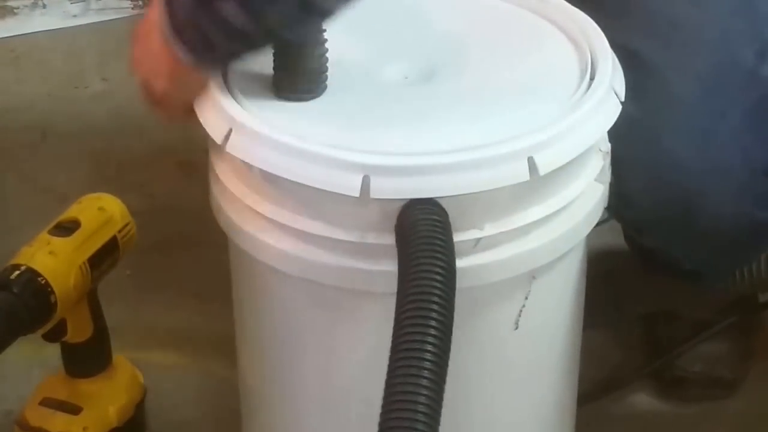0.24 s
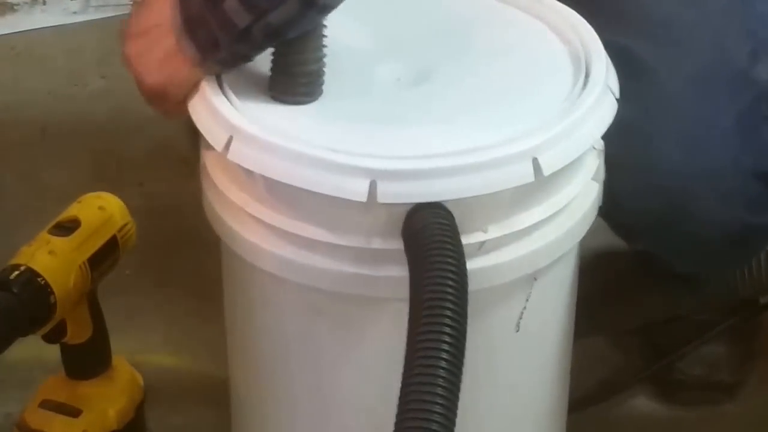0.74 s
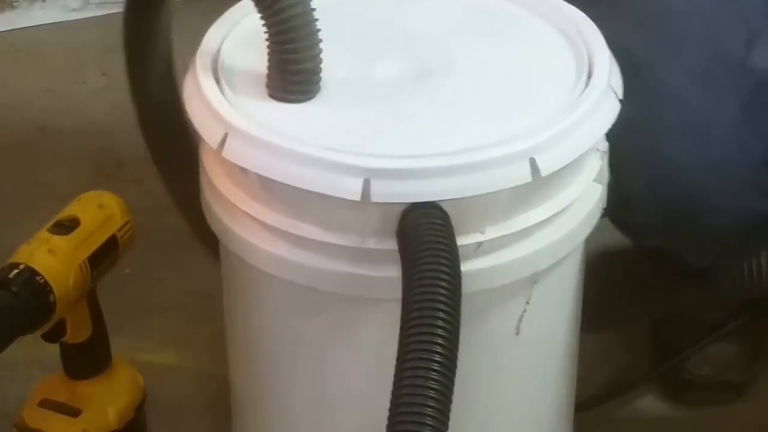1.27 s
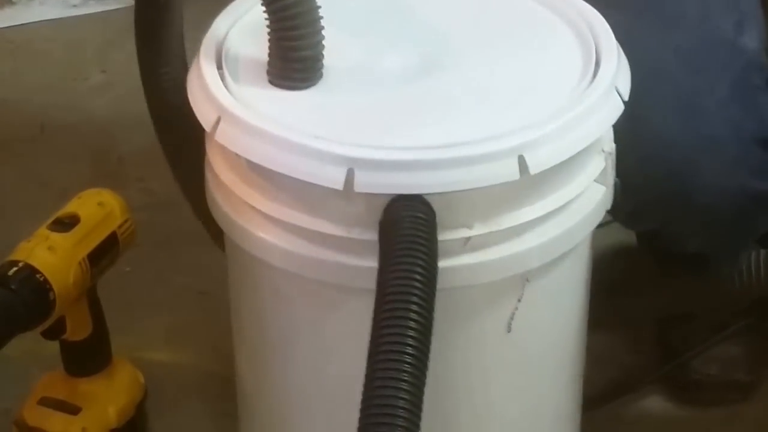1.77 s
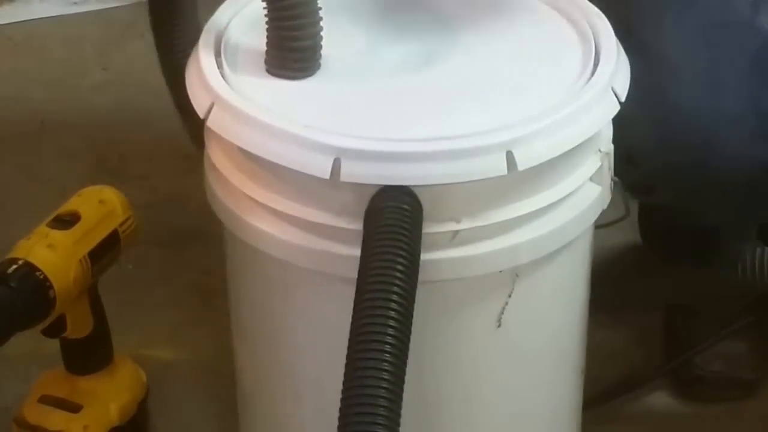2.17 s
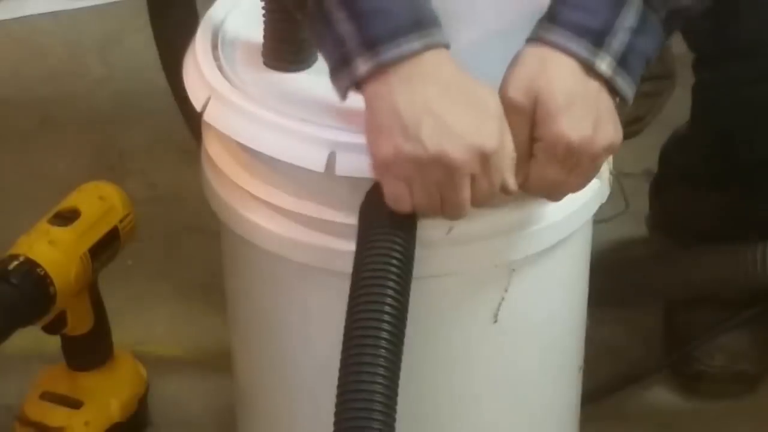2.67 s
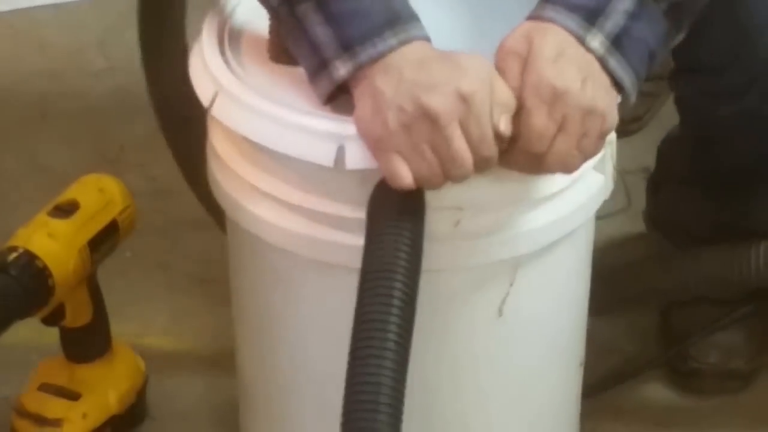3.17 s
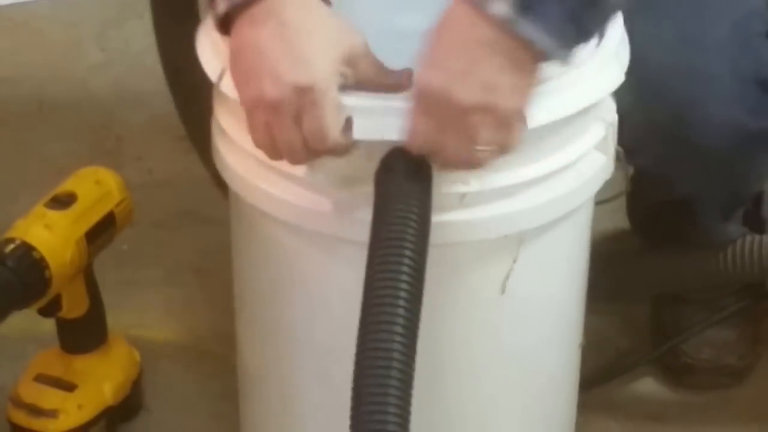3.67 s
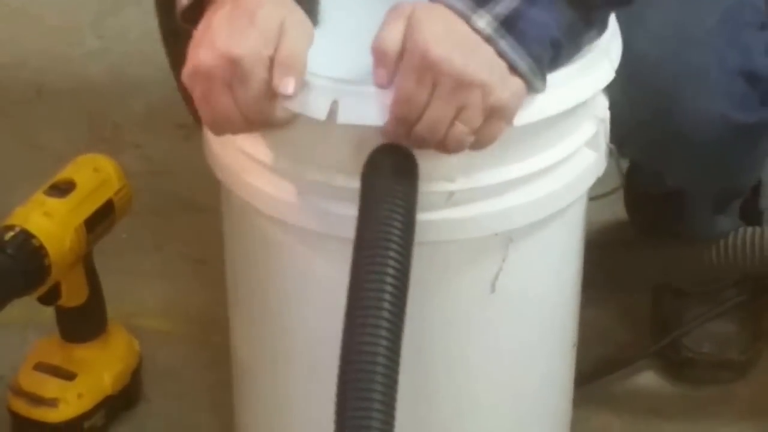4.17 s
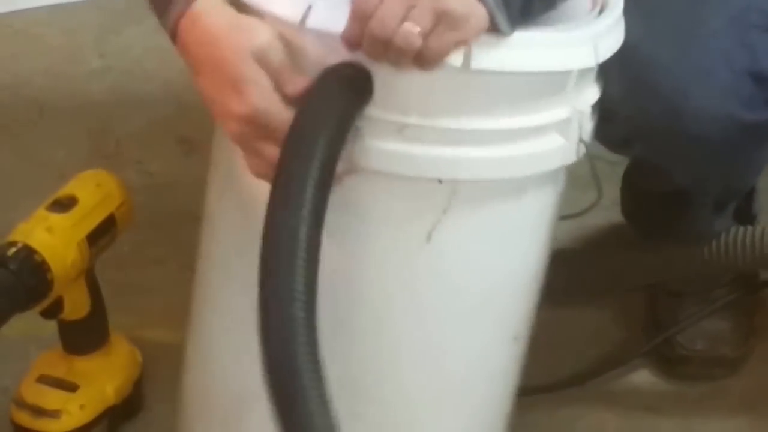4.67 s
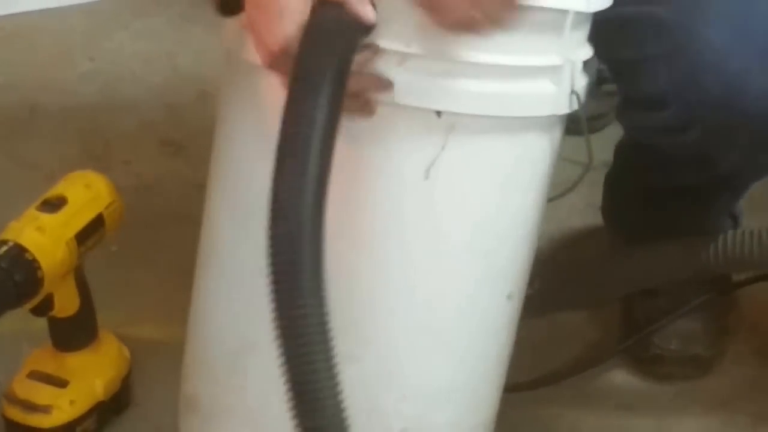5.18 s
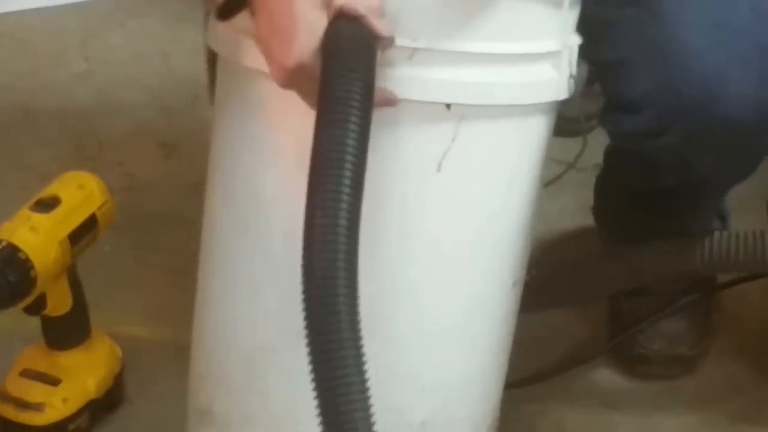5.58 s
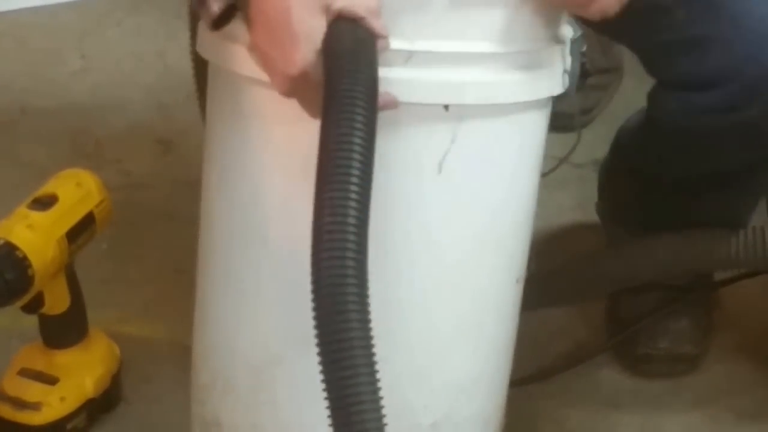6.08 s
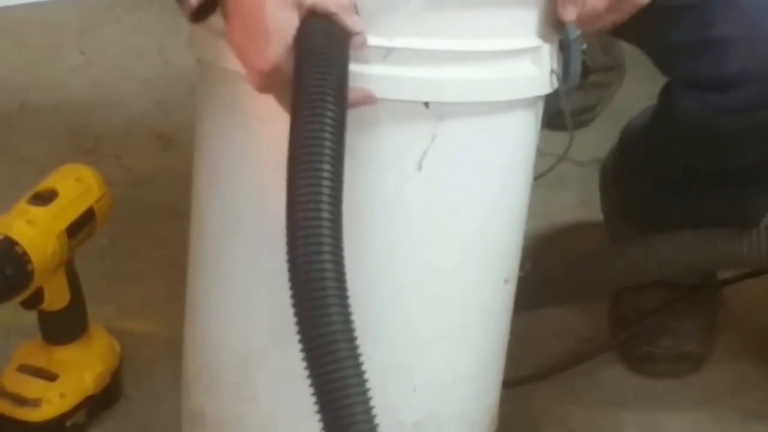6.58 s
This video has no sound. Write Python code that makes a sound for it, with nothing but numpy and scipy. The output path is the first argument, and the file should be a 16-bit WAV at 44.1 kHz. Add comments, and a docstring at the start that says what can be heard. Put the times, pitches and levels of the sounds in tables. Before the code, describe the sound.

Hands rub plastic and a tight bucket lid snaps loose with three sharp, ringing cracks, over low room rumble and steady left-side hiss.

```python
"""Hands and sleeves rub plastic over a low room rumble and steady hiss; ticks and hollow thumps follow.
A tight lid is being pried off a bucket, close by in a small workshop: its rim snaps over the bead
three times, then cracks once more faintly. Later a ribbed hose makes the ticks come faster. Random grains make
the friction, decaying sines the blows; the left microphone hisses, the right one is dull."""
import sys
import numpy as np
from scipy import signal
from scipy.fft import rfft, irfft
from scipy.io import wavfile

SR = 44100
rng = np.random.default_rng(int(sys.argv[2]) if len(sys.argv) > 2 else 0)


def transcribe(u):
    """Save the signal u as a 16-bit wav file named by the first command-line argument.

    u: samples, shape (n,) or (channels, n), limited to [-1, 1]; the rate is SR.
    q: integer samples, one column per channel.
    """
    v = np.clip(np.atleast_2d(u).T, -1, 1)
    q = np.round(v * 32767).astype(np.int16)
    wavfile.write(sys.argv[1], SR, q)


N = 301057   # length in samples
AGE = np.arange(SR // 2) / SR   # time since a blow, s


def from_db(db):
    """Decibels to gain."""
    return 10 ** (np.asarray(db) / 20)


def rms_one(x):
    """Scale to rms 1."""
    return x / np.sqrt(np.mean(x ** 2) + 1e-20)


def at_hz(points, hz):
    """Read a table on a log-frequency axis."""
    f, value = np.transpose(points)
    return np.interp(np.log(hz + 0.0012), np.log(f), value)   # the offset avoids log(0)


def colour(x, spectrum):
    """Causal (minimum-phase) filter with the given spectrum, by folding its cepstrum."""
    size = 4096
    gain = from_db(at_hz(spectrum, np.fft.rfftfreq(size, 1 / SR)))
    cepstrum = irfft(np.log(gain))
    cepstrum[1:size // 2] *= 2
    cepstrum[size // 2 + 1:] = 0
    impulse = irfft(np.exp(rfft(cepstrum)))
    return signal.oaconvolve(x, impulse)[:len(x)]


def fade(t60, rise=1e-5):
    """Envelope of a blow: quick rise (time constant, s), exponential decay by 60 dB in t60 seconds."""
    return from_db(-60 * AGE / t60) * (1 - np.exp(-AGE / rise))


def ring(hz, t60, rise):
    """One damped mode."""
    return np.sin(2 * np.pi * hz * AGE) * fade(t60, rise)


def add(track, s, sound):
    """Mix a sound in at time s."""
    at = int(s * SR)
    track[at:at + len(sound)] += sound[:N - at]


def delay(x, s):
    """The same sound s seconds later."""
    n = np.arange(len(x))
    return np.interp(n - s * SR, n, x, left=0)


def grains(per_s, spread_db, size):
    """Random stick-slip clicks of uneven size; rms 1."""
    born = rng.random(size) < per_s / SR
    sign = rng.choice([-1, 1], size)
    strength_db = spread_db * np.minimum(rng.exponential(1, size), 4)
    return rms_one(born * sign * from_db(strength_db))


def clumps(per_s, depth_db, size):
    """Gain of a grip that catches and lets go at random."""
    knots = rng.standard_normal(4096)
    position = np.arange(size) / SR * per_s
    return from_db(depth_db * np.interp(position, np.arange(len(knots)), knots))


# Brief sinkings of the background. Each row: middle in seconds, half width in seconds, level in dB.
LULLS = [(2.75, 0.26, -3.5), (4.82, 0.57, -4)]


def background(spectrum):
    """Noise with the given density; its level sags smoothly in each lull."""
    t = np.arange(N) / SR
    level_db = sum(db * np.exp(-((t - s) / width) ** 2) for s, width, db in LULLS)
    noise = rng.standard_normal(N) * np.sqrt(SR / 2)   # 0 dB per Hz
    return from_db(level_db) * colour(noise, spectrum)


# How long the workshop rings. Each row: frequency in Hz, decay by 60 dB in seconds.
ROOM_T60 = [(100, 0.29), (300, 0.37), (700, 0.3), (1500, 0.34), (4000, 0.38), (12000, 0.28)]


def room_response(onset):
    """Diffuse stereo tail, dying band by band; the two sides are most alike in the bass."""
    edges = np.geomspace(40, 16000, 11)
    out = 0
    for low, high in zip(edges, edges[1:]):
        hz = np.sqrt(low * high)
        band = signal.butter(2, [low, high], "band", fs=SR, output="sos")
        mid, side = signal.sosfilt(band, rng.standard_normal((2, len(AGE))))
        alike = 1 / (1 + (hz / 1900) ** 2)
        stereo = np.sqrt(1 + alike) * mid + np.sqrt(1 - alike) * side * [[1], [-1]]
        out = out + stereo * fade(at_hz(ROOM_T60, hz))
    out = out * (1 - np.exp(-(AGE / onset) ** 2))
    return rms_one(out) / np.sqrt(len(AGE))   # unit energy


def room(feed, count=16):
    """Hands and bucket keep moving, so each stretch of sound meets the room by different paths."""
    out, step = np.zeros((2, N + len(AGE))), N // count + 1
    for at in range(0, N, step):
        stretch = feed[None, at:at + step]
        tail = signal.fftconvolve(stretch, room_response(onset=0.0053), axes=1)
        out[:, at:at + tail.shape[1]] += tail
    return out[:, :N]


STROKE_ATTACK_S, STROKE_RELEASE_S = 0.0066, 0.072   # time constants of pressing on and letting go
HOSE_FROM_S, HOSE_SCUFF_DB = 4.6, -63.5   # once the hose is held it scuffs; level before the mix gain


def stroke(s, length):
    """Pressure of one stroke: it builds, holds and lets go."""
    age = np.maximum(np.arange(N) / SR - s, 0)
    release = np.exp(-np.maximum(age - length, 0) / STROKE_RELEASE_S)
    return (1 - np.exp(-age / STROKE_ATTACK_S)) * release


# A hand or sleeve strokes the plastic. Each row: start in seconds, length in seconds,
# then drag, scuff and swish levels in dB before the mix gains.
STROKES = [(-0.03, 0.22, -39.5, -46.5, -48.5), (0.274, .2, -47.5, -56, -57.5),
           (0.65, 0.034, -49, -59, -56.5), (1.326, 0.22, -48.5, -56, -63.5),
           (1.83, 0.29, -36.5, -52.5, -60.5), (2.122, 0.028, -32.5, -64, -63), (2.5, 0.075, -47, -54, -58),
           (3.526, 0.61, -52.5, -58, -60.5), (4.557, .17, -51.5, -58, -55.5), (5.2, 0.12, -58, -71, -55.5),
           (5.875, 0.06, -43.5, -51, -62.5), (6.12, 0.05, -48, -51, -55.5)]
# The hands never rest entirely: drag, scuff and swish levels in dB before the mix gains.
RESTING_RUB = (-51, -65, -79.5)
# Colours of the low drag, the middle scuff and the high swish. Each row: frequency in Hz, level in dB.
DRAG = [(25, -58), (60, -3.5), (100, -1), (170, 1), (280, -5), (420, -15), (900, -30), (3000, -64)]
SCUFF = [(250, -10.5), (700, 5), (1200, 4.5), (1900, 2.5), (2500, 3), (3300, 5.5), (5000, -14.5),
         (8000, -54)]
SWISH = [(2500, -16.5), (5000, 8.5), (6800, 7.5), (8500, -11), (10000, -14), (12500, -7), (15500, -5)]


def rubbing():
    """Skin and cloth drag over the plastic in dense, uneven grains."""
    power = from_db(RESTING_RUB)[:, None] ** 2
    for s, length, *levels in STROKES:
        power = power + np.outer(from_db(levels), stroke(s, length)) ** 2
    drag, scuff, swish = np.sqrt(power)
    scuff = np.hypot(scuff, from_db(HOSE_SCUFF_DB) * stroke(HOSE_FROM_S, N / SR))
    grip = clumps(70, 3.84, N)
    low = from_db(-6.5) * drag * rms_one(colour(grains(900, 3.4, N), DRAG))
    middle = from_db(2.5) * scuff * rms_one(colour(grains(1500, 3.4, N), SCUFF))
    high = from_db(4.5) * swish * rms_one(colour(grains(5000, 3.3, N), SWISH))
    return grip * (low + middle + high)


# Gritty slides and creaks of strained plastic. Each row: start in seconds, length in seconds,
# level in dB, lowest frequency in Hz, highest frequency in Hz.
SLIDES = [(0, .22, -44.5, 606, 1800), (0.052, 0.18, -35.5, 3930, 7460), (2.019, 0.15, -44.5, 1310, 3600),
          (3.34, 0.062, -33, 1000, 4950), (4.552, 0.1, -51, 10200, 15600), (4.906, 0.043, -37.5, 760, 2360),
          (5.126, 0.23, -44.5, 1200, 3500), (6.12, 0.17, -43.5, 783, 1810)]


def slides():
    """Clumps of stick-slip grains swell and fade in one range of the plastic's ringing."""
    out = np.zeros(N)
    for s, length, db, low_hz, high_hz in SLIDES:
        slips = grains(2500, 2.7, len(AGE)) * clumps(89.8, 6.1, len(AGE))
        slips = slips[:int(length * SR)]
        band = signal.butter(4, [low_hz, high_hz], "band", fs=SR, output="sos")
        body = signal.sosfilt(band, slips)
        swell = np.sin(np.linspace(0, np.pi, len(body)))
        add(out, s, from_db(db) * rms_one(body) * swell)
    return out


# Fainter ticks at random: middle knock, click and fine edge levels in dB before the gains in ticks().
FAINT_TICK = (-43.5, -55.5, -63)
FAINT_TICKS_PER_S, HOSE_TICKS_PER_S = 4, 14   # bare hands; while the ribbed hose is held
FAINT_SPREAD_DB = 2.5


def faint_ticks():
    """Rows like those of TICKS, at random moments and strengths; the ribs of the hose make them come faster."""
    count = 96
    t = np.arange(N) / SR
    due = np.cumsum(np.where(t < HOSE_FROM_S, FAINT_TICKS_PER_S, HOSE_TICKS_PER_S)) / SR   # mean count so far
    turns = np.cumsum(rng.uniform(.2, 1.8, count))
    levels = np.array(FAINT_TICK) + FAINT_SPREAD_DB * rng.standard_normal((count, 3))
    return [(np.interp(turn, due, t), *row) for turn, row in zip(turns, levels) if turn < due[-1]]


# Fingers and hose tick on the plastic. Each row: time in seconds, then knock, click and fine edge
# levels in dB before the gains in ticks().
TICKS = [(0.072, -38, -52, -37.5), (0.306, -39, -51, -41.5), (0.676, -47, -54, -45), (0.757, -38, -66, -68),
         (0.971, -36.5, -48, -48.5), (1.833, -25, -37.5, -64), (1.941, -37, -48, -42.5),
         (2.013, -30, -39, -31), (2.511, -39, -47, -48), (2.902, -48, -48, -66), (3.527, -26.5, -37.5, -36),
         (4.494, -40, -53, -42.5), (4.633, -47, -56, -39.5), (4.7, -40, -53, -39),
         (4.775, -48, -38.5, -43.5), (4.84, -38, -47.5, -58), (5.097, -51, -48.5, -42),
         (5.158, -53, -42, -59), (5.263, -40, -50, -52), (5.438, -34, -46, -62), (5.95, -36.5, -35, -44),
         (6.537, -34, -40.5, -63)]
# Colours of the woody knock, the hard click and the fine edge. Each row: frequency in Hz, level in dB.
KNOCK = [(150, -22), (450, -3.5), (750, 5), (1300, 8), (2200, 6), (5000, -64)]
CLICK = [(700, 4.5), (1800, 0.5), (2400, 12), (3200, 15), (4500, 5), (6500, -0.5), (8500, -33)]
EDGE = [(2000, -11), (4500, 1.5), (6800, 7), (8800, -16.5), (12000, -12.5), (15500, -11)]
TICK_T60_S = 0.041


def ticks():
    """Each small slip is a brief burst of grains with a woody, a hard and a fine part."""
    rows = TICKS + faint_ticks()
    burst = fade(TICK_T60_S, rise=0.0009)
    out = 0
    for column, (spectrum, gain_db) in enumerate([(KNOCK, 6), (CLICK, 9), (EDGE, 12)]):
        force = np.zeros(N)
        for s, *levels in rows:
            add(force, s - .001, from_db(levels[column] + gain_db) * burst)
        out = out + colour(force * grains(6000, 1.9, N), spectrum)
    return out


# The lid and wall flex. Each row: time in seconds, flex level in dB, pitch in Hz, rattle level in dB;
# both levels before the gains in thumps().
THUMPS = [(0.132, -25, 149, -50), (.301, -33.5, 127, -40), (.922, -23.5, 161, -37),
          (1.489, -25.5, 134, -34), (1.831, -24, 169, -35), (2.126, -22, 153, -39.5),
          (2.146, -9.5, 211, -16.5), (2.948, -34, 160, -49), (3.116, -15.5, 215, -31.5),
          (3.385, -31, 131, -31.5), (4.17, -34, 172, -41), (4.8943, -13, 185, -29.5),
          (6.116, -22, 243, -38), (6.353, -35.5, 190, -39)]
# Colour of the loose rattle within a thump. Each row: frequency in Hz, level in dB.
RATTLE = [(40, -28), (85, -1.5), (180, -3.5), (300, 0.5), (420, -4.5), (650, -18), (830, -10), (1100, -19),
          (2000, -22.5), (5000, -55)]
FLEX_T60_S = 0.027
# The panel springs back with one pitch; its dB is relative to the flex, before the gains.
REBOUND_S, REBOUND_HZ, REBOUND_DB, REBOUND_T60_S = .021, 269.3, -13, 0.083


def thumps():
    """A broad panel pops through and springs back, higher and weaker, while the lid rattles on its seat."""
    flex, rattle = np.zeros((2, N))
    for s, db, hz, rattle_db in THUMPS:
        pop = ring(hz, FLEX_T60_S, rise=0.003)
        rebound = ring(REBOUND_HZ, REBOUND_T60_S, rise=0.0026)
        loose = fade(0.12, rise=0.00078) * grains(1500, 0.79, len(AGE))
        add(flex, s, 3.0 * from_db(db) * pop)
        add(flex, s + REBOUND_S, 2.15 * from_db(db + REBOUND_DB) * rebound)
        add(rattle, s, 9 * from_db(rattle_db) * loose)
    return flex + colour(rattle, RATTLE)


# Ringing modes of the lid. Each row: frequency in Hz, middle level in dB, decay by 60 dB in seconds.
LID = [(219, -13.5, 0.049), (278, -28, 0.077), (398, -20.5, 0.14), (513, -22, 0.091), (631, -13.5, 0.22),
       (856, -17, 0.069), (940, -17.5, 0.11), (997, -12, 0.1), (1083, -7, 0.084), (1222, -6.5, 0.065),
       (1420, -36, .1), (1560, -18, 0.11), (1654, -26, 0.25), (1749, -24, 0.11), (1864, -21, 0.063),
       (1980, -24, 0.053), (3190, -20, 0.039)]


def lid_ring(rise, vary_db):
    """Each blow excites the lid's modes with strengths of its own."""
    luck = rng.normal(0, 1, len(LID))
    out = 0
    for k, (hz, db, t60) in enumerate(LID):
        sign = (-1) ** k
        out = out + sign * from_db(db + vary_db * luck[k]) * ring(hz, t60, rise)
    return out


# Rim snaps. Each row: time in seconds, flap pitch in Hz, flap level in dB, lid ring level in dB,
# crack level in dB, chatter level in dB, chatter decay by 60 dB in seconds, room feed level in dB,
# top of crack and chatter in Hz. Flap, crack and chatter levels are before the gains in snaps().
SNAPS = [(3.1181, 812, -3, -12.5, -12, -24, 0.13, -4, 6450),
         (3.3789, 667, -5.5, -9, -2.5, -9.5, 0.18, -1, 8500),
         (4.2329, 624, -6.5, -7.5, -4, -12, 0.2, 0, 16000),
         (6.1126, 1210, -20, -30, -18, -30, 0.17, -4.5, 7000)]
# Colour of a rim crack and its chatter. Each row: frequency in Hz, level in dB.
CRACK = [(80, -20), (350, -4), (700, 5.5), (1150, 4.5), (1900, -1.5), (2450, -6.5), (3100, -3),
         (4300, -5.5), (6300, -11), (7500, -21), (8800, -46.5), (14000, -29)]


def snaps():
    """The rim cracks over the bead, the freed flap whips and chatters, the lid rings; direct sound and room feed."""
    direct, feed = np.zeros((2, N))
    for s, flap_hz, flap_db, lid_db, crack_db, chatter_db, chatter_t60, room_db, top_hz in SNAPS:
        whip = ring(flap_hz, 0.024, rise=0.001) - 1.08 * ring(flap_hz * 1.296, 0.014, rise=0.001)
        flap = 1.22 * from_db(flap_db) * whip
        crack = 2.8 * from_db(crack_db) * fade(0.033, rise=0.0028) * grains(9000, 2.06, len(AGE))
        chatter = 1.5 * from_db(chatter_db) * fade(chatter_t60, rise=0.021) * grains(1500, 2.3, len(AGE))
        low_pass = signal.butter(3, top_hz, fs=SR, output="sos")
        grit = colour(signal.sosfilt(low_pass, crack + chatter), CRACK)
        lid = from_db(lid_db) * lid_ring(rise=0.00079, vary_db=3.5)
        sound = flap + lid + grit
        add(direct, s, sound)
        add(feed, s, from_db(room_db) * sound)
    return direct, feed


def low_cut(x, low_cut_hz=52):
    """The microphones pass little deep bass."""
    return signal.sosfilt(signal.butter(4, low_cut_hz, "high", fs=SR, output="sos"), x)


# Early echoes of the workshop. Each row: delay in seconds, gain as a factor.
ECHOES = [(.0065, 0.05), (0.0199, 0.089), (.033, 0.14)]
# Steady low background of the place. Each row: frequency in Hz, density in dB per Hz.
RUMBLE = [(20, -81.5), (45, -85.5), (80, -75.5), (140, -76), (250, -76.5), (400, -87), (800, -89.5),
          (2500, -104), (8000, -125)]


def scene():
    """The bucket stands close by, a little to the left; the workshop answers."""
    snap, snap_feed = snaps()
    thump = thumps()
    handling = ticks() + rubbing() + slides()
    near = snap + thump + handling
    near = near + sum(gain * delay(near, s) for s, gain in ECHOES)
    tail = room(from_db(-4.5) * snap_feed + from_db(-10) * thump + from_db(-7) * handling)
    stereo = np.array([near, delay(near, .00008)])   # the right microphone hears it later
    return low_cut(stereo + tail) + background(RUMBLE)


# Hiss of each microphone. Each row: frequency in Hz, density in dB per Hz.
LEFT_HISS = [(25, -86), (100, -89), (1000, -110), (2800, -101), (3400, -89), (3900, -72), (4300, -70),
             (4900, -77.5), (5700, -83), (6600, -90.5), (7500, -102), (9000, -119), (15000, -110)]
RIGHT_HISS = [(25, -92), (100, -88), (1000, -108), (3500, -101), (6000, -108), (9000, -120), (15000, -108)]
# Right microphone against the left. Each row: frequency in Hz, level in dB.
RIGHT_PORT = [(60, 2.5), (200, -2), (700, -4), (1300, -5), (2400, -6), (3300, -15), (4500, -18.5),
              (7000, -45.5), (10000, -30), (15000, -6)]
CUTOFF_HZ = 15850


def record(dry):
    """The right port is muffled, each microphone adds its hiss, peaks are rounded, the top is cut."""
    left = dry[0] + background(LEFT_HISS)
    right = colour(dry[1], RIGHT_PORT) + background(RIGHT_HISS)
    both = np.array([left, right])
    both = both / (1 + (both / .9) ** 6) ** (1 / 6)
    low_pass = signal.ellip(12, .1, 80, CUTOFF_HZ, fs=SR, output="sos")
    return signal.sosfilt(low_pass, both)


dry = scene()
out = record(dry)
transcribe(out)
```